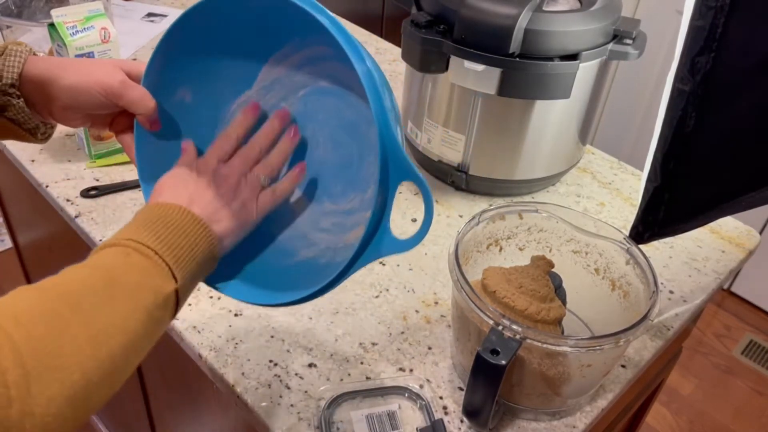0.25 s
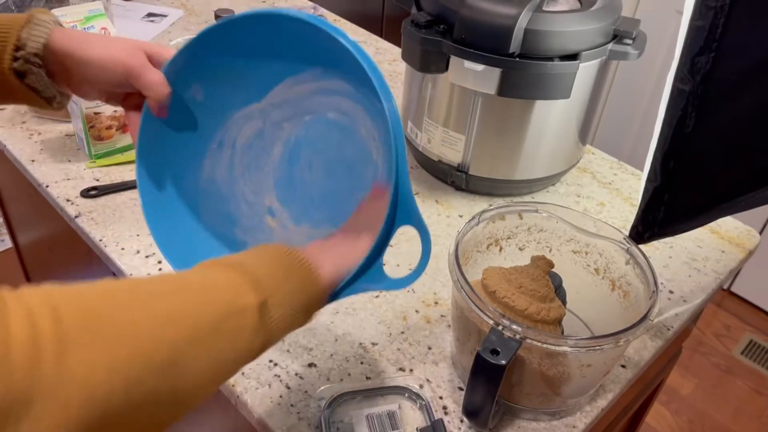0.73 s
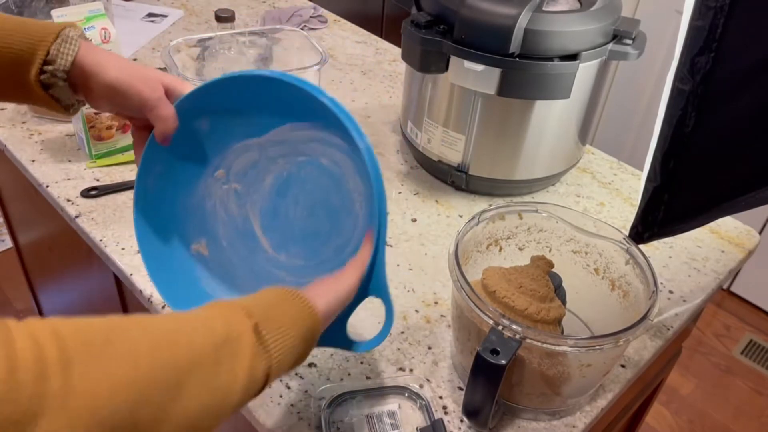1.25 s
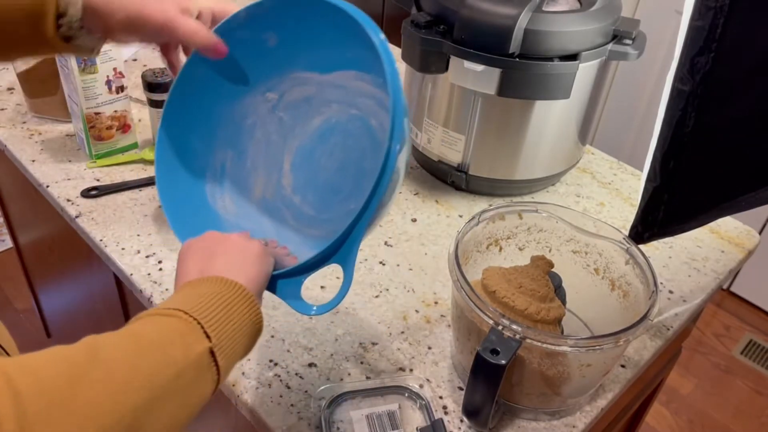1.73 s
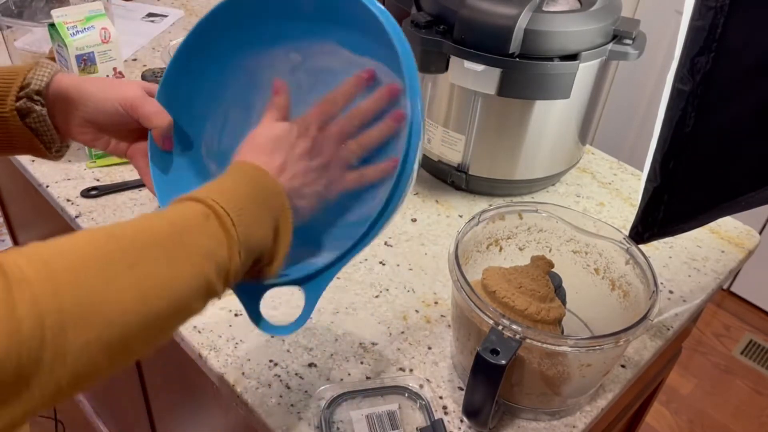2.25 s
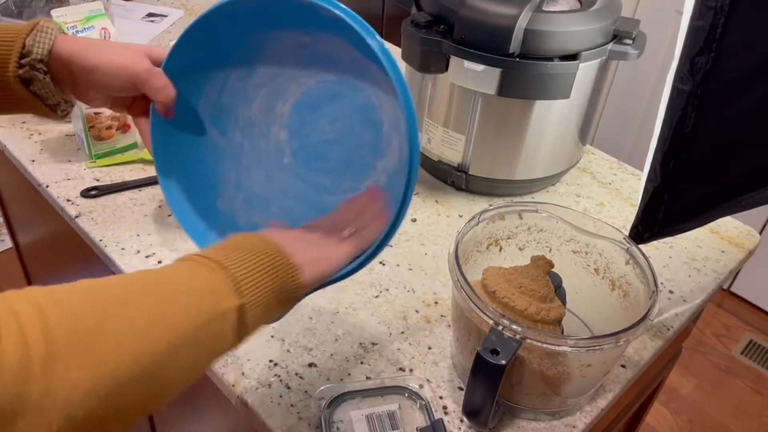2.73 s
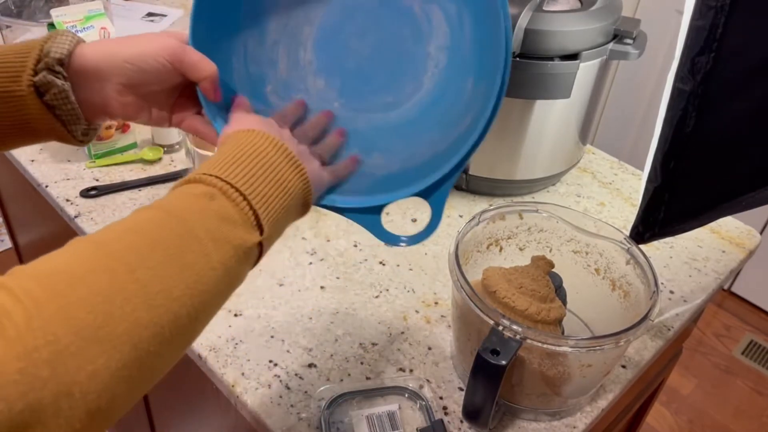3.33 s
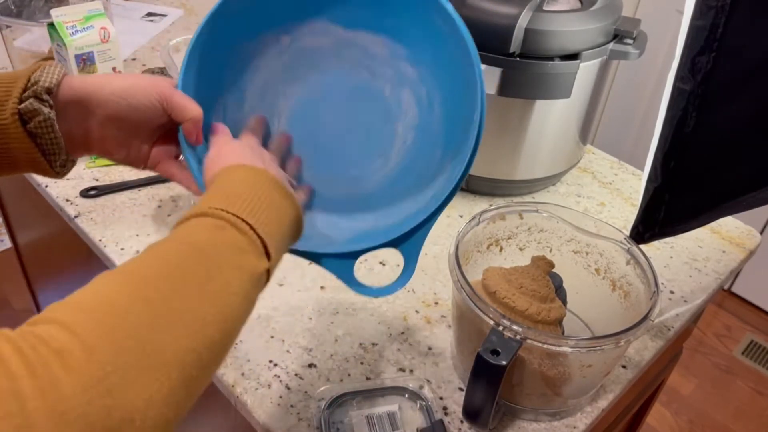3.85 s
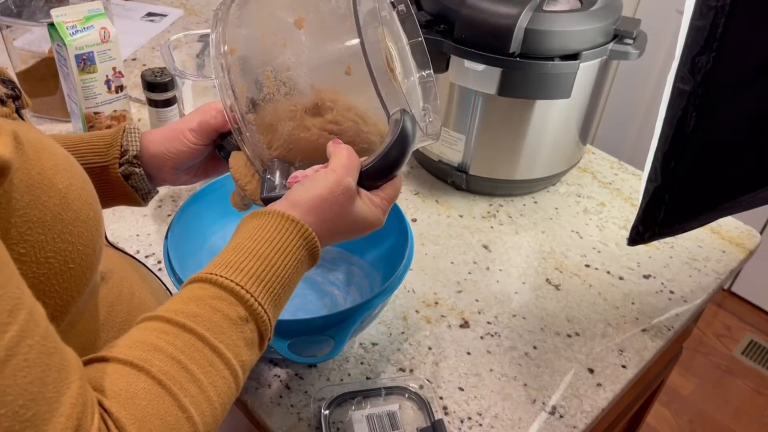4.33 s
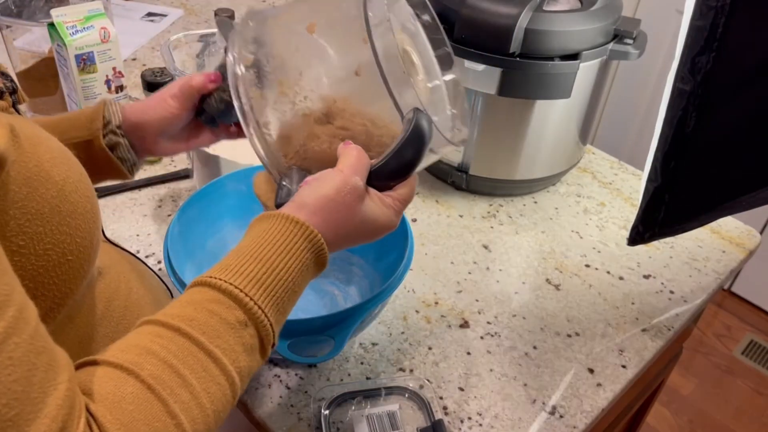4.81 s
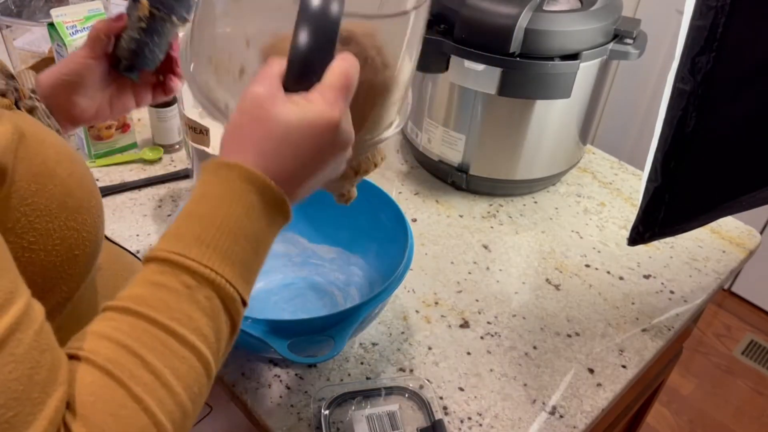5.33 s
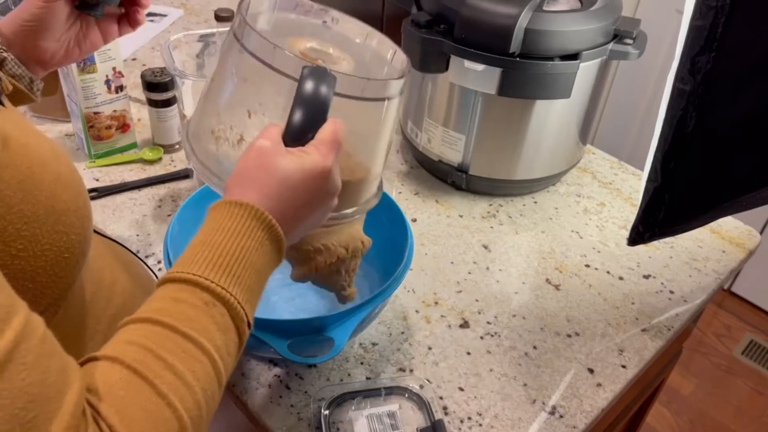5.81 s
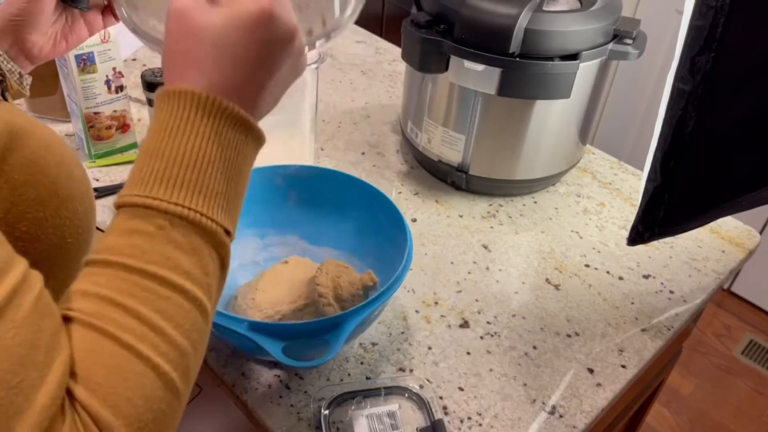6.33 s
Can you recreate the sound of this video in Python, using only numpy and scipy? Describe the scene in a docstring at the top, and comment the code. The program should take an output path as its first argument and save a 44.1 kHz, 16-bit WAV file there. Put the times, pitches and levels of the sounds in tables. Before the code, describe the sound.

Dry skin-on-plastic sweeps, about three a second, hiss and rasp beside the microphone, with hollow bumps on the bowl. They stop dead at a scene change. In the quiet kitchen a plastic jar ticks and creaks, a hub knocks twice, and dough peels with damp crackles. One heavy, clipped knock lands, followed by a short dull patter and soft air rumble. Sound sits in the right channel, the left almost silent.

```python
"""First a hand is heard wiping flour round a plastic mixing bowl in a small kitchen: rough grains of noise per stroke.
After an abrupt change of scene the bowl stands on the counter. A clear plastic jar clicks and creaks as it is tipped,
a blade knocks on it, and sticky dough crackles off. Then the dough drops into the bowl with a knock that overloads
the microphone's preamplifier. Knocks ring the modes of bowl, jar and blade; room noise and puffs of air lie behind.
Only the right channel is live: the left holds a trace and faint hiss."""
import sys
import numpy as np
from scipy import signal
from scipy.fft import rfft, irfft
from scipy.io import wavfile

SR = 44100
rng = np.random.default_rng(int(sys.argv[2]) if len(sys.argv) > 2 else 0)


def materialize(psi):
    """Save the field psi as 16-bit PCM at rate SR to the path in sys.argv[1].

    A 1-D psi becomes a single channel; in a 2-D psi each row is a channel.
    """
    bounded = np.clip(np.atleast_2d(psi).T, -1, 1)
    quanta = np.round(bounded * 32767).astype(np.int16)
    wavfile.write(sys.argv[1], SR, quanta)


N = 289296
TIME = np.arange(N) / SR
CUT_S = 4.135   # the change of scene
# All levels in the tables are set before the preamplifier.


def from_db(db):
    """Turn decibels into a gain."""
    return 10 ** (np.asarray(db) / 20)


def rms_one(x):
    """Scale a sound to unit power."""
    return x / np.sqrt(np.mean(x ** 2) + 1e-20)


def in_time(rows):
    """Draw each column of a (seconds, values) curve at every sample."""
    s, *columns = np.transpose(rows)
    return [np.interp(TIME, s, c) for c in columns]


def band(x, hz, kind, order=2):
    """Keep one part of the spectrum with a causal Butterworth filter."""
    sections = signal.butter(order, np.clip(hz, 10, .45 * SR), kind, fs=SR, output="sos")
    return signal.sosfilt(sections, x + 1e-18)


def coloured(x, spectrum):
    """Shape a steady sound by (Hz, dB) points, falling away below the first one; unit power."""
    hz, db = np.transpose(spectrum)
    f = np.maximum(np.fft.rfftfreq(N, 1 / SR), 1)
    gain = from_db(np.interp(np.log(f), np.log(hz), db))
    low_end = np.minimum(f / hz[0], 1) ** 2
    return rms_one(irfft(rfft(x) * gain * low_end, N))


def drift(rate):
    """Wander at random with unit power, through `rate` new values a second."""
    knots = rng.standard_normal(4000)
    return rms_one(np.interp(TIME * rate, np.arange(len(knots)), knots))


def grains(per_s, spread_db):
    """Tiny slips at random moments; the larger the spread, the more a few of them stand out."""
    sizes = from_db(spread_db * np.minimum(rng.exponential(1, N), 4))
    signed = sizes * rng.choice([-1, 1], N)
    return rms_one(signed * (rng.random(N) < per_s / SR))


def ring(x, hz, width_hz):
    """One mode: a unit click starts a dying cosine of height 1, with no sound far below its pitch."""
    r, w = np.exp(-np.pi * width_hz / SR), 2 * np.pi * hz / SR
    return signal.lfilter([.5, 0, -.5], [1, -2 * r * np.cos(w), r * r], x + 1e-18)


def contact(soft_hz):
    """Force pulse of a blow: the softer the contact (lower cut-off in Hz), the longer it lasts."""
    return band(signal.unit_impulse(SR // 2), soft_hz, "low")


def burst(t60, low_hz, high_hz, order=1):
    """Modes too crowded to tell apart: a band of noise that dies by 60 dB in t60 seconds."""
    t = TIME[:SR // 2]
    noise = band(rng.standard_normal(len(t)), low_hz, "high")
    noise = band(noise, high_hz, "low", order=order)
    return rms_one(band(noise, 11700, "low", order=3)) * from_db(-60 * t / t60)


def add(out, s, sound):
    """Mix a sound in at a time in seconds."""
    at = int(round(s * SR))
    out[at:at + len(sound)] += sound[:N - at]


def swell(start, top, end):
    """A movement gathers speed from rest and slows to rest again; 0 to 1."""
    return np.sin(np.pi / 2 * np.interp(TIME, [start, top, end], [0, 1, 0]))


def swells(rows):
    """Joint gain of separate smooth movements, added in power."""
    return np.sqrt(sum((from_db(db) * swell(s - length / 2, s, s + length / 2)) ** 2 for s, length, db in rows))


# Colour of the steady kitchen noise. Each row: pitch in Hz, strength per Hz in dB.
ROOM_COLOUR = [(35, -36), (60, -3), (115, -5.5), (248, -11), (335, -11.5), (433, -14), (599, -18.5),
               (673, -23.5), (849, -24), (1350, -31), (2200, -35), (2600, -37.5), (6120, -40),
               (15500, -50.5)]
# How loud that noise is over time. Each row: time in seconds, level in dB.
ROOM_LEVEL = [(0, -61.5), (4.1, -63), (4.16, -59), (6.56, -57)]
# Puffs of air stirred at the microphone. Each row: middle in seconds, length in seconds, level in dB.
PUFFS = [(.58, 0.1, -38.5), (.8, 0.16, -43), (1.12, 0.22, -40), (1.33, 0.78, -42.5), (1.71, 0.1, -35.5),
         (2.22, 0.21, -42.5), (2.45, .16, -40), (4.1, 0.21, -45), (4.37, .12, -53), (5.9, 0.93, -44),
         (6.48, .42, -28.5)]


def air():
    """Steady room noise, and a low rumble that swells with each puff of moving air."""
    room = from_db(in_time(ROOM_LEVEL)[0]) * coloured(rng.standard_normal(N), ROOM_COLOUR)
    rumble_colour = [(14, 11.5), (22, -0.5), (40, -5), (62, -11.5), (115, -39.5), (400, -65), (2000, -120)]
    rumble = coloured(rng.standard_normal(N), rumble_colour)
    still_air_db = -55
    return room + np.hypot(from_db(still_air_db), swells(PUFFS)) * rumble


def kitchen(x):
    """Diffuse reflections of a small room build up within milliseconds; the treble dies first."""
    warm = burst(t60=0.36, low_hz=250, high_hz=1490)
    bright = burst(t60=0.16, low_hz=1800, high_hz=5000)
    build_up = np.clip((TIME[:SR // 2] - .003) / 0.0016, 0, 1)
    tail = (warm + from_db(-0.5) * bright) * build_up
    return signal.fftconvolve(x, tail / np.sqrt(np.sum(tail ** 2)))[:N]


# The jar creaks in the grip. Each row: start in seconds, length in seconds, level in dB.
CREAKS = [(4.877, 0.084, -53.5), (5.254, 0.074, -49), (5.324, .05, -53), (5.531, 0.028, -48)]
SLIP_GAP_S, SLIP_JITTER = 0.0095, 0.3   # typical time between slips, and its unevenness
CREAK_FADE_DB = 4.5   # fade over a whole creak


def creaks():
    """Plastic sticks and slips in a short, uneven, fading run of ticks."""
    out = np.zeros(N)
    for start, length, db in CREAKS:
        gaps = SLIP_GAP_S * np.exp(SLIP_JITTER * rng.standard_normal(size=16))
        for age in np.cumsum(gaps) - gaps[0]:
            tick = burst(t60=0.014, low_hz=1600, high_hz=3660, order=4) * from_db(rng.normal(0, 2.5))
            if age < length:
                add(out, start + age, from_db(db - CREAK_FADE_DB * age / length) * tick)
    return out


# The blade knocks on the jar as it is drawn out. Each row: time in seconds, level in dB.
BLADE_KNOCKS = [(5.1936, -37.5), (5.215, -44.5)]
# Modes that such a knock rings. Each row: pitch in Hz, width in Hz, strength in dB.
BLADE_MODES = [(145, 35, -3), (200, 28, -2), (315, 46, -0.5), (488, 44, -0.5), (560, 32, -5),
               (770, 120, 2.5), (956, 41, 3), (1340, 66, -3.5), (3980, 270, 7), (4330, 400, -9),
               (7600, 100, -10.5)]


def blade():
    """The blade's hub bumps twice against the jar; neighbouring modes swing in opposite senses."""
    out = np.zeros(N)
    force = contact(7400)
    knock = sum((-1) ** k * from_db(db) * ring(force, hz, width)
                for k, (hz, width, db) in enumerate(BLADE_MODES))
    for s, db in BLADE_KNOCKS:
        add(out, s, from_db(db) * knock)
    return out


# Clicks of the jar. Each row: time in seconds, then levels of ring, clack and snap in dB.
CLICKS = [(4.522, -72, -75, -48), (4.875, -37.5, -47, -50.5), (4.895, -43, -47.5, -52),
          (4.97, -41.5, -49, -48), (5.028, -47.5, -54, -59), (5.274, -42, -51, -55), (5.324, -51, -48, -52),
          (5.377, -41.5, -61, -64), (5.478, -41.5, -60, -70), (5.526, -33, -41, -36.5),
          (5.592, -39.5, -45.5, -67), (5.617, -39, -61, -68), (5.644, -45, -67, -67),
          (5.689, -44, -58, -55), (5.733, -41, -56, -50), (5.779, -44.5, -58.5, -52),
          (5.817, -41, -59.5, -54), (5.918, -35, -56, -54.5), (5.985, -33, -47, -48),
          (6.047, -37.5, -40.5, -34), (6.222, -33, -62, -52), (6.308, -39, -46.5, -51),
          (6.532, -35, -47, -49)]
# Modes of the jar, also used for the crackle. Each row: pitch in Hz, width in Hz, basic strength in dB.
JAR_MODES = [(478, 21, 18.5), (974, 130, 22.5), (1158, 50, 18), (1333, 43, 4.5), (1570, 59, 10),
             (2000, 160, 0), (2520, 340, -5), (3350, 250, -0.5), (4000, 530, 9)]
CLICK_HZ, CLICK_SPREAD_OCTAVES = 1090, 0.17   # where a click rings most strongly, and how far that varies


def jar_clicks():
    """Each click favours the jar's modes near its own pitch, with a clack and a bright snap on top."""
    out = np.zeros(N)
    force = contact(2840)
    for s, ring_db, clack_db, snap_db in CLICKS:
        main_hz = CLICK_HZ * 2 ** (CLICK_SPREAD_OCTAVES * rng.standard_normal())
        tone = 0
        for hz, width, mode_db in JAR_MODES:
            luck_db = rng.normal(0, 3.1)
            distance_db = 8.3 * abs(np.log2(hz / main_hz))   # loss per octave away from the main pitch
            tone = tone + from_db(mode_db + luck_db - distance_db) * ring(force, hz, width)
        clack = from_db(clack_db) * burst(t60=0.022, low_hz=2060, high_hz=3700, order=4)
        snap = from_db(snap_db) * burst(t60=0.0073, low_hz=4650, high_hz=8650, order=2)
        add(out, s, from_db(ring_db) * tone / np.abs(tone).max() + clack + snap)
    return out


# Level of the crackle: a faint rustle at first, then dough peeling off the jar.
# Each row: time in seconds, level in dB.
CRACKLE_LEVEL = [(4.16, -69), (4.6, -76.5), (4.78, -92), (5.2, -90), (5.27, -61), (5.44, -63.5),
                 (5.53, -54), (5.66, -60.5), (5.84, -68), (6.02, -79), (6.3, -67)]
# Sleeve movements. Each row: middle in seconds, length in seconds, level in dB.
RUSTLES = [(4.33, 0.78, -74.5), (4.69, 0.25, -71), (5.42, .24, -71), (5.7, 0.74, -69.5), (6.17, 0.1, -68)]


def peeling():
    """Clumps of damped crackle, first a faint rustle, then dough tearing off the jar; a sleeve rustles too."""
    tears = grains(per_s=450, spread_db=0.5) * from_db(3.0 * drift(44))
    # damped jar modes: wider, with their differences in strength halved
    crackle = rms_one(sum(from_db(db / 2) * np.sqrt(width) * ring(tears, hz, width * 1.8)
                          for hz, width, db in JAR_MODES))
    crackle = rms_one(band(crackle, [700, 3500], "band", order=3))
    rustle = rms_one(band(grains(per_s=3000, spread_db=2.5), [4600, 10500], "band", order=2))
    both = from_db(in_time(CRACKLE_LEVEL)[0]) * crackle + swells(RUSTLES) * rustle
    return both * (TIME > CUT_S)


LANDING_S, SLUMP_DB, SLUMP_T60_S = 6.366, -38, 0.37   # the dough spreads out after it lands
COUNTER_HZ, COUNTER_WIDTH_HZ, COUNTER_DB = 57.5, 5, -32   # the counter booms faintly under the blow


def slump():
    """The landed dough spreads with a dull, fading patter while the counter booms."""
    age = TIME - LANDING_S
    patter = rms_one(band(grains(per_s=2500, spread_db=1.0), [650, 2400], "band"))
    out = patter * from_db(SLUMP_DB - 60 * np.abs(age) / SLUMP_T60_S) * (age > 0)
    add(out, LANDING_S, from_db(COUNTER_DB) * ring(contact(200), COUNTER_HZ, COUNTER_WIDTH_HZ))
    return out


# A crumb falls, then the dough lands and settles.
# Each row: time in seconds, level in dB, cut-off of the contact in Hz, level of the crack in dB.
BLOWS = [(6.244, -36.5, 338, -79), (6.324, -24, 140, -53), (6.337, -41, 600, -50), (6.3415, -14, 198, -48),
         (6.3426, -42, 500, -33), (6.3509, -16, 470, -44), (6.3644, -1, 2150, -14.5),
         (6.374, -12, 2000, -37), (6.393, -28, 597, -39), (6.404, -14, 606, -41), (6.428, -29, 900, -42)]
# Modes of the bowl on the counter. Each row: pitch in Hz, relative strength in dB, time to die by 60 dB in seconds.
STANDING_BOWL = [(213.6, -8.5, 0.1), (238, -12.5, 0.18), (307, -14, 0.092), (369, 4.5, 0.044),
                 (453, -0.5, 0.093), (484, 3, 0.2), (515.5, -3, 0.13), (575, -6, 0.18), (668, -13, .22),
                 (708.4, -17, 0.23), (786, -41, .2), (911, -33, 0.113), (1040, -20, 0.08),
                 (1136, -27, 0.13), (1320, -43, .05), (1577, -12, 0.065), (1800, -11, 0.054),
                 (2320, -34, 0.051)]


def blows():
    """Soft dough loads the bowl, then slams its base on the counter: ringing modes and a noisy crack."""
    out = np.zeros(N)
    for s, db, soft_hz, crack_db in BLOWS:
        force = contact(soft_hz)
        tone = 0
        for hz, mode_db, t60 in STANDING_BOWL:
            width = np.log(1000) / (np.pi * t60)
            tone = tone + from_db(mode_db - 5.0) * ring(force, hz, width)
        crack = from_db(crack_db) * burst(t60=0.038, low_hz=640, high_hz=1870)
        add(out, s, from_db(db) * tone + crack)
    return out


# Knocks on the bowl's wall, by the palm and, in the last row, by the jar.
# Each row: time in seconds, peak of the thud in dB, cut-off of the contact in Hz, level of the slap in dB.
PATS = [(.368, -37.5, 400, -65), (0.496, -33, 250, -46), (1.4854, -22.5, 4500, -36),
        (1.7086, -40, 3000, -54), (1.9872, -27.5, 447, -55.5), (2.057, -48, 3000, -48.5),
        (2.203, -22.5, 2400, -36), (2.218, -31, 600, -36.5), (2.2274, -22.5, 257, -32.5),
        (2.2331, -24, 3000, -32), (2.44, -30.5, 201, -72), (6.0928, -28.5, 1410, -76)]
# Modes of the hand-held bowl, also used for rubbing.
# Each row: pitch in Hz, width in Hz, strength in dB when rubbed (before weighting by width), in dB when knocked.
HELD_BOWL = [(114, 25, -36, -9.5), (213, 74, -12.5, 0.5), (308.4, 25, -2, 1.5), (348, 24, -4.5, -6.5),
             (459.7, 64.6, 1, 7), (509.4, 37, 3, -15.5), (584, 65, -6, -31), (1059, 120, -6.5, 5),
             (1560, 97, 1.5, 15.5), (2630, 260, -17, 11.5), (4600, 450, -19, -1)]


def pats():
    """A knock on the wall: a damped thud and a slap of skin."""
    out = np.zeros(N)
    for s, db, soft_hz, slap_db in PATS:
        force = contact(soft_hz)
        thud = sum(from_db(mode_db) * ring(force, hz, width) for hz, width, _, mode_db in HELD_BOWL)
        slap = from_db(slap_db) * burst(t60=0.048, low_hz=1300, high_hz=5200, order=2)
        add(out, s, from_db(db) * thud / np.abs(thud).max() + slap)
    return out


# Sweeps of the hand. Each row: start, fastest moment and end in seconds, then at full speed the levels in dB
# of the wall's rasp, the skin's hiss and the bowl's body.
STROKES = [(-0.08, -0.017, 0.078, -41, -34.0, -47), (0.037, 0.1, 0.2, -43.5, -37.0, -52.5),
           (0.11, 0.176, 0.333, -66, -61.5, -67.0), (0.264, 0.305, 0.36, -54, -57.5, -57),
           (0.32, 0.465, 0.57, -39.5, -34.0, -44.5), (0.42, 0.584, 0.692, -38.5, -30, -46.5),
           (0.711, 0.769, 0.86, -38, -27, -57), (0.654, 0.86, 1.12, -40.5, -32.5, -50),
           (1.042, 1.225, 1.362, -37.5, -29.0, -48.5), (1.23, 1.329, 1.387, -42, -38, -53.0),
           (1.358, 1.494, 1.54, -40.5, -42, -56.0), (1.475, 1.485, 1.584, -43.5, -42.5, -58.5),
           (1.533, 1.618, 1.707, -52.0, -48.5, -57), (1.633, 1.69, 1.863, -61.5, -60, -62.5),
           (1.839, 1.879, 2.04, -61.5, -63, -66), (1.943, 2.035, 2.14, -59, -58.5, -58.5),
           (2.26, 2.286, 2.366, -44, -38.5, -56), (2.213, 2.421, 2.604, -41.5, -33, -45.5),
           (2.42, 2.597, 2.752, -35.5, -28, -47.5), (2.713, 2.801, 3.007, -37.5, -29.5, -52.5),
           (2.938, 3.109, 3.215, -41, -34.5, -52), (3.176, 3.308, 3.533, -40.5, -38.5, -53),
           (3.438, 3.573, 3.693, -40.5, -35.5, -55), (3.662, 3.773, 3.954, -42, -35.5, -56.5),
           (3.767, 3.951, 4.09, -50, -46, -54), (4.006, 4.148, 4.183, -48.5, -39.5, -54)]
RASP_POWER, HISS_POWER, BODY_POWER = 1.65, 2.33, 0.76   # each grows as this power of the hand's speed


def stroke_gains():
    """Rasp, hiss and body each follow the speed of the hand; overlapping sweeps add in power."""
    power = np.zeros((3, N))
    for start, fastest, end, *levels_db in STROKES:
        speed = swell(start, fastest, end)
        moving = speed > 0
        for layer, db, law in zip(power, levels_db, (RASP_POWER, HISS_POWER, BODY_POWER)):
            layer[moving] += (from_db(db) * speed[moving] ** law) ** 2
    return np.sqrt(power)


# Colour of the friction before the bowl is tilted anew. Each row: pitch in Hz, strength per Hz in dB.
FIRST_GRIP = [(410, -43), (700, -21), (919, -23), (1070, -14), (1470, 0), (2050, -5.5), (2460, -4.5),
              (4240, -9), (6100, -9.5), (6760, -11), (8880, -9.5), (12000, -18), (14000, -23.5),
              (15500, -41)]
# Colour of the friction after that. Each row: pitch in Hz, strength per Hz in dB.
SECOND_GRIP = [(410, -48), (700, -22), (931, -29.5), (1180, -18), (1560, -2.5), (1780, -5), (2340, -7),
               (3820, -11), (4520, -13.5), (5790, -12.5), (6590, -16), (8430, -13), (13300, -23),
               (15500, -42)]
REGRIP_S = 2.17   # when the bowl is tilted anew
SHEEN_SWING_DB, SHEEN_VALUES_PER_S = 0.7, 11   # the hiss wanders at random between slightly brighter and duller


def rubbing():
    """Floury skin slips on the wall in dense grains: a rasp, a hiss above it and the bowl's ringing body."""
    rasp_gain, hiss_gain, body_gain = stroke_gains()
    slips = grains(per_s=17000, spread_db=0.0) * from_db(0.83 * drift(110))
    # the opposite wall mirrors the sound, along a path whose length wanders at random
    path_s = 0.001096 * (1 + .25 * np.tanh(drift(6.5)))
    heard = slips + 0.31 * np.interp(TIME - path_s, TIME, slips)
    friction = np.where(TIME < REGRIP_S, coloured(heard, FIRST_GRIP), coloured(heard, SECOND_GRIP))

    split_hz, sheen_hz = 2650, 7500
    rasp = rms_one(band(friction, split_hz, "low", order=3))
    treble = band(friction, split_hz, "high", order=3)
    # as the part above sheen_hz rises, the part below it sinks
    sheen = from_db(SHEEN_SWING_DB * drift(SHEEN_VALUES_PER_S))
    dull = band(treble, sheen_hz, "low", order=1) / sheen
    bright = band(treble, sheen_hz, "high", order=1) * sheen
    hiss = rms_one(dull + bright)

    shudder = band(grains(per_s=1500, spread_db=1.5), 900, "low")
    # neighbouring modes swing in opposite senses
    body = rms_one(sum((-1) ** k * from_db(db) * width * ring(shudder, hz, width)
                       for k, (hz, width, db, _) in enumerate(HELD_BOWL)))
    return rasp_gain * rasp + hiss_gain * hiss + body_gain * body


def scene():
    """All sources at one microphone, which feeds the right channel; the left holds only a trace and faint hiss."""
    rub = rubbing()
    handling = pats() + jar_clicks() + creaks() + blade() + peeling()
    landing = blows() + slump()
    first_scene = np.clip((CUT_S - TIME) / 0.0049, 0, 1)   # 1, falling to 0 just before the cut
    wiping = (rub + from_db(-20.5) * kitchen(rub)) * first_scene
    room = kitchen(from_db(-17.5) * (handling + landing))
    sound = wiping + handling + landing + room + air()
    left = from_db(-75.0) * sound + from_db(-85) * rng.standard_normal(N)
    return np.array([left, sound])


def record(dry):
    """The preamplifier boosts the sound and rounds off peaks near full scale; a steep filter cuts the top."""
    driven = from_db(6.5) * dry
    clipped = driven / (1 + (driven / .97) ** 8) ** (1 / 8)
    cutoff_hz = 15200
    return signal.sosfilt(signal.ellip(10, .1, 80, cutoff_hz, fs=SR, output="sos"), clipped)


dry = scene()
out = record(dry)
materialize(out)
```